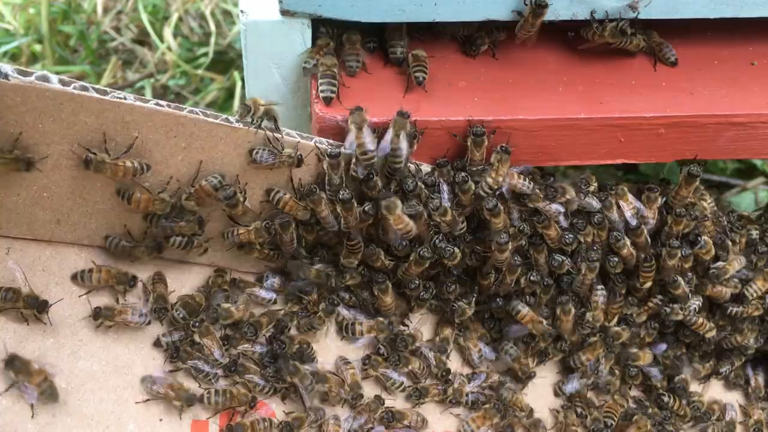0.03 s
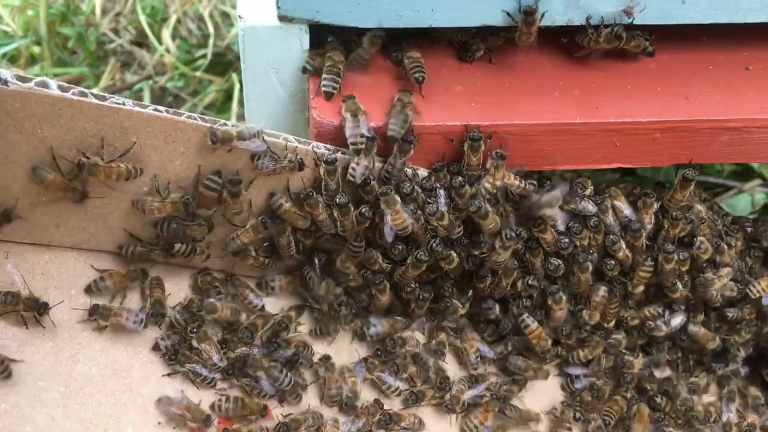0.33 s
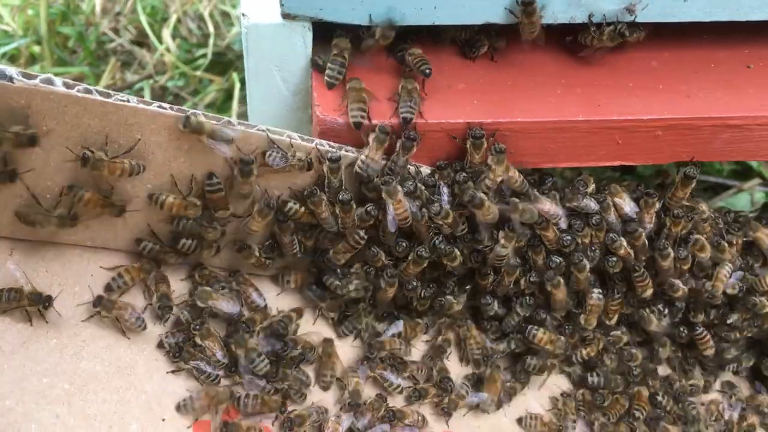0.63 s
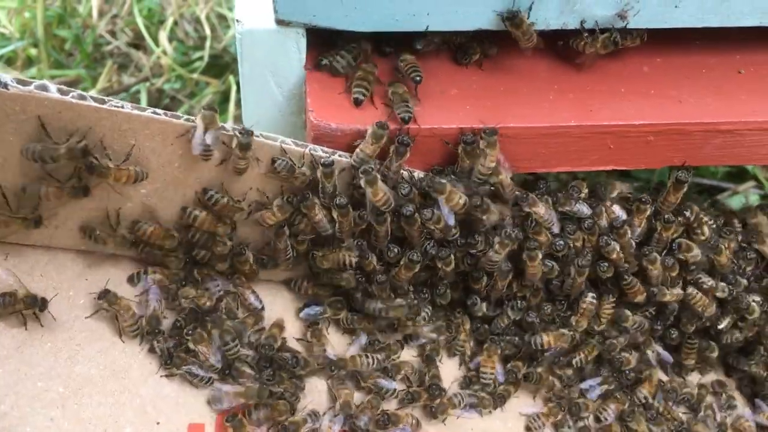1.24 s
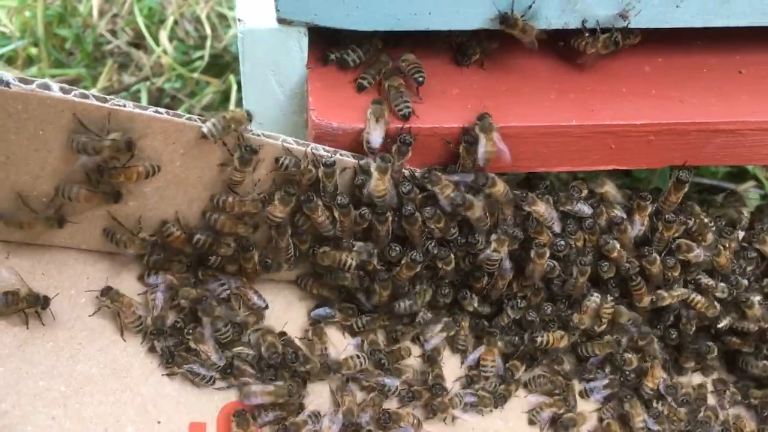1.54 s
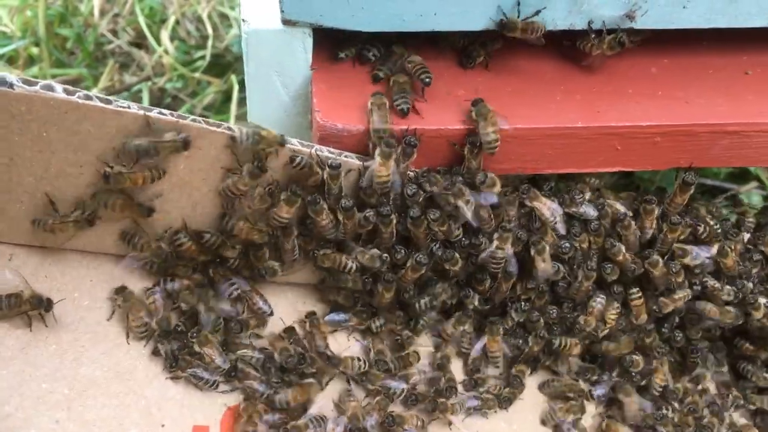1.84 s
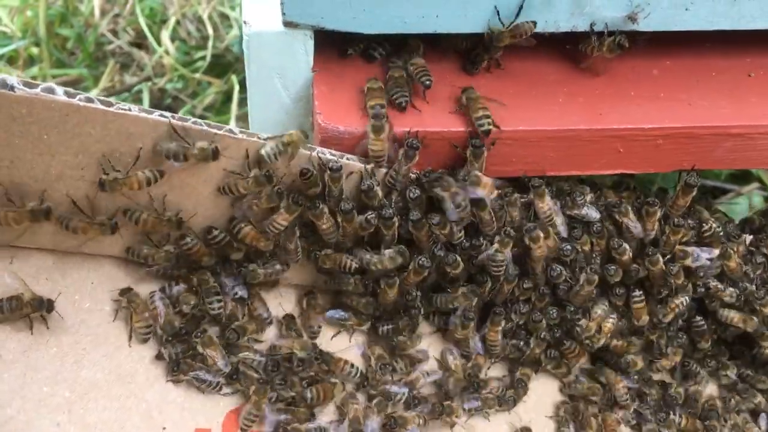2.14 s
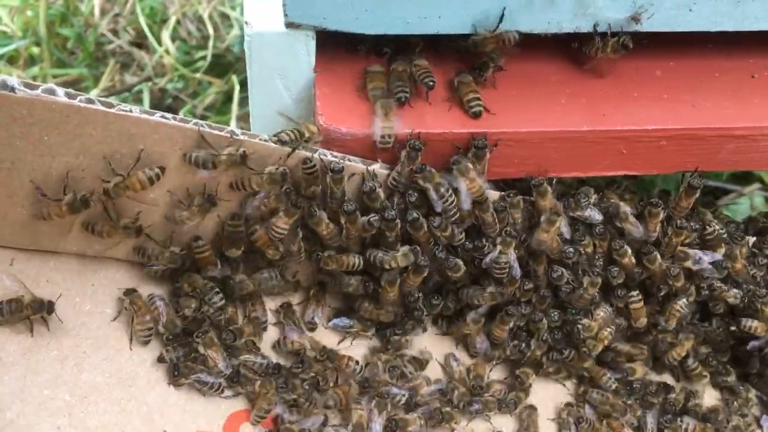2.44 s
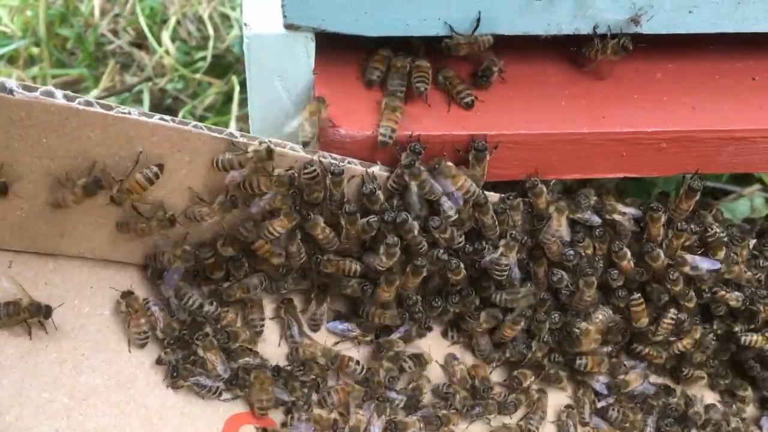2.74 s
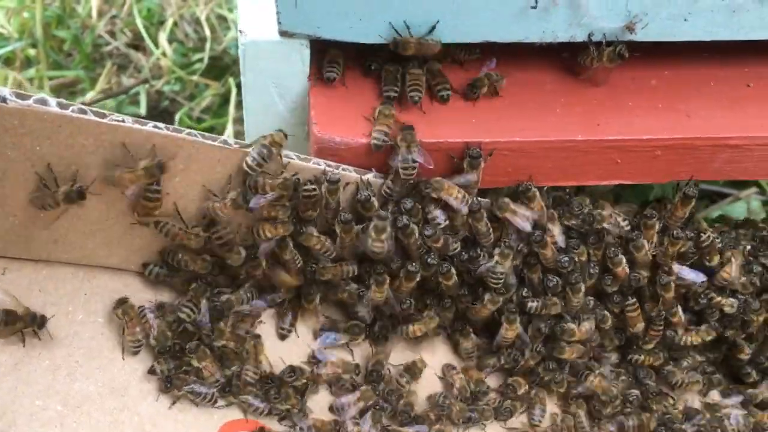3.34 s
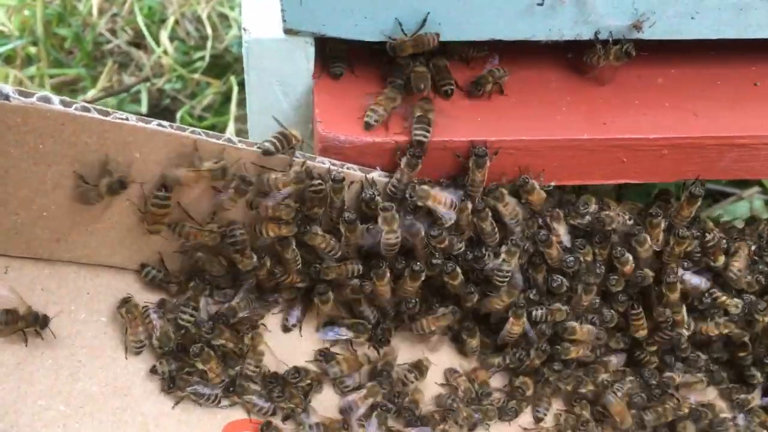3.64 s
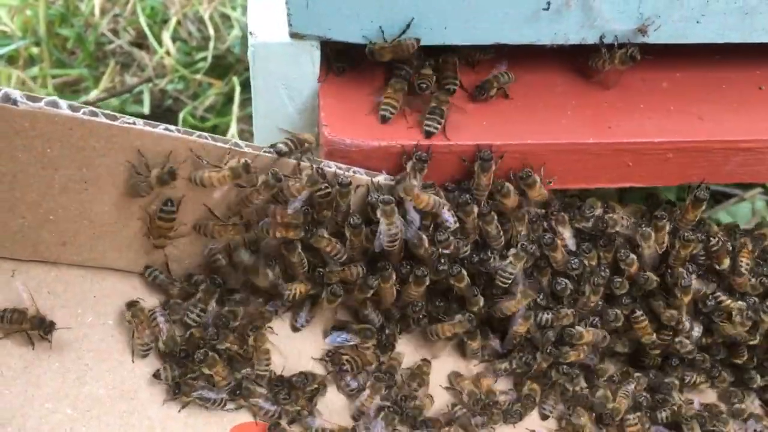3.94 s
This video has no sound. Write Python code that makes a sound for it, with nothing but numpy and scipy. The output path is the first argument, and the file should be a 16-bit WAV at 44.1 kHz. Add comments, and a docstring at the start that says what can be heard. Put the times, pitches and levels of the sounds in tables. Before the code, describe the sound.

Crawling honeybees rustle without a break, heard up close as countless feet tick and scrape on cardboard. Under that, their wings hum softly, swelling and sinking a little, over a gentle low rumble of open air.

```python
"""A steady, close rustle: a dense heap of honeybees crawling over cardboard in front of a hive.
Thousands of feet tick and scrape, and the card gives them all its colour.
Under the rustle sits the hum of many shivering wings, one puff of air per beat,
and behind that a soft low rumble of outdoor air."""
import sys
import numpy as np
from scipy import signal
from scipy.fft import rfft, irfft
from scipy.io import wavfile

SR = 44100
rng = np.random.default_rng(int(sys.argv[2]) if len(sys.argv) > 2 else 0)


def unload_wav(signal):
    """Save mono or channel-first audio to the path in sys.argv[1] as 16-bit WAV at rate SR, clipped to [-1, 1]."""
    wavfile.write(
        sys.argv[1],
        SR,
        np.round(np.clip(np.atleast_2d(signal).T, -1, 1) * 32767).astype(np.int16),
    )


N = 176400

# The tone of a footfall on cardboard. Each row: frequency in Hz, relative gain in dB.
CARDBOARD_EQ = [(100, -15), (300, 0.5), (490, -2.5), (600, 0), (760, -0.76), (1100, .5), (1800, -0.5),
                (2650, 0), (3100, -3.5), (3800, -11.5), (4450, -17), (4900, -23), (5250, -22), (6000, -23),
                (7600, -32), (9100, -33.5), (9900, -36), (10450, -41.5), (10900, -38), (12000, -39),
                (15500, -45)]
# The tone shaping of the wing puffs. Each row: frequency in Hz, relative gain in dB.
WING_EQ = [(70, -9), (120, 3.5), (175, 0.5), (245, -4), (315, -2.5), (450, -13.5), (900, -18),
           (2500, -25.5), (6000, -63)]
# The bass-heavy tone of outdoor air. Each row: frequency in Hz, relative gain in dB.
AIR_EQ = [(15, -60), (25, -21), (35, -12), (54, -0.5), (70, -2), (94, 1), (110, -7), (250, -12.5),
          (500, -19.5), (2000, -41), (8000, -68)]
# The rise and fall of the wing hum. Each row: time in seconds, level in dB.
HUM_FADER = [(0, -45.5), (.35, -48), (.52, -45), (.8, -45), (1.1, -49), (1.35, -44.5), (1.85, -49.5),
             (2.05, -46.5), (2.55, -45), (2.8, -48.5), (3.1, -44.5), (3.35, -48.5), (3.55, -46), (4, -45)]
# The gentle swells of the rumble. Each row: time in seconds, level in dB.
AIR_FADER = [(0, -51), (.2, -48.5), (.29, -44), (.4, -45), (.7, -46), (1.05, -45.5), (1.5, -43.5),
             (1.9, -45), (2.2, -45), (2.4, -41.5), (2.6, -43.5), (2.8, -46), (3.12, -46), (3.33, -45),
             (3.6, -44.5), (4, -46)]

STEPS_PER_S, STEP_SPREAD_DB = 14000, 1.5
STEPS_DB, SCRAPE_DB = -43, -41.5
BUSTLE_DB, BUSTLE_PER_S = 0.14, 12   # the whole heap stirs and settles
FLICKER_DB, FLICKER_PER_S = 0.4, 18
WING_LOW_HZ, WING_HIGH_HZ = 109.98, 249.75
WANDER_SHARE, WANDER_PER_S = .05, 3   # each bee's beat rate wavers
FANNING_DB, FANNING_PER_S = 3.5, 3.1   # each bee fans harder and softer


def crawling_bees():
    """Feet tick, legs and bodies slide over each other, and both sound through the cardboard."""
    bustle = from_db(BUSTLE_DB * drift(BUSTLE_PER_S))
    footfalls = rng.random(N) < STEPS_PER_S * bustle / SR
    accent_db = STEP_SPREAD_DB * np.minimum(rng.exponential(1, N), 5)
    polarity = rng.choice([-1, 1], N)
    ticks = from_db(STEPS_DB) * equalise(footfalls * from_db(accent_db) * polarity, CARDBOARD_EQ)
    scrape = from_db(SCRAPE_DB) * equalise(rng.standard_normal(N), CARDBOARD_EQ)
    return flicker(bustle * (ticks + scrape))


def flicker(rustle, bands=10):
    """Overlapping bands of the rustle each swell and sink a little on their own."""
    centres = np.log(np.geomspace(400, 14000, bands))
    bins, spectrum = log_bins(), rfft(rustle)
    mix = np.zeros(N)
    for solo in np.eye(bands):
        band = irfft(spectrum * np.interp(bins, centres, solo), N)
        mix += band * from_db(FLICKER_DB * drift(FLICKER_PER_S))
    return mix


def wing_hum(bees=24):
    """Each bee gives one puff per wingbeat, at a wandering rate and strength of its own."""
    puffs = np.zeros(N)
    for centre_hz in np.geomspace(WING_LOW_HZ, WING_HIGH_HZ, bees):
        start_phase = rng.random()
        beat_hz = centre_hz * np.exp(WANDER_SHARE * drift(WANDER_PER_S))
        beat_count = np.floor(start_phase + np.cumsum(beat_hz) / SR)
        puffs += np.diff(beat_count, prepend=0) * from_db(FANNING_DB * drift(FANNING_PER_S))
    low_cut = signal.butter(2, 70, "high", fs=SR, output="sos")
    puffs = signal.sosfilt(low_cut, puffs - puffs.mean())
    return fader(HUM_FADER) * equalise(puffs, WING_EQ)


def outdoor_air():
    """A bed of low, gently swelling noise."""
    return fader(AIR_FADER) * equalise(rng.standard_normal(N), AIR_EQ)


def from_db(db):
    """Decibels to gain."""
    return 10 ** (np.asarray(db) / 20)


def rms_one(x):
    """Scale to rms 1."""
    return x / np.sqrt(np.mean(x ** 2) + 1e-20)


def drift(per_s):
    """Slow random modulation with a spread of 1."""
    hop, run_in = 40, 2000   # samples per control step, steps to settle
    pole = np.exp(-2 * np.pi * per_s * hop / SR)
    noise = rng.standard_normal(N // hop + run_in + 2)
    slow = signal.lfilter([1], [1, -2 * pole, pole * pole], noise)[run_in:]
    return np.interp(np.arange(N) / hop, np.arange(len(slow)), rms_one(slow - slow.mean()))


def log_bins():
    """Log frequency of every spectral bin."""
    return np.log(np.maximum(np.arange(N // 2 + 1) * SR / N, 1))


def equalise(x, curve):
    """Apply an EQ curve, then scale to rms 1."""
    hz, db = np.transpose(curve)
    gain = from_db(np.interp(log_bins(), np.log(hz), db))
    return rms_one(irfft(rfft(x) * gain, N))


def fader(rows):
    """The gain of a level curve at every sample."""
    return from_db(np.interp(np.arange(N) / SR, *np.transpose(rows)))


def scene():
    """Rustle, hum and air, mixed to mono."""
    return (crawling_bees() + wing_hum() + outdoor_air())[None]


def record(dry):
    """A moment of silence, a snap fade-in and a steep high cut."""
    start_s, fade_s, cutoff_hz = 0.0345, 0.0017, 15750
    fade_in = np.clip((np.arange(N) / SR - start_s) / fade_s, 0, 1)
    high_cut = signal.ellip(12, .1, 70, cutoff_hz, fs=SR, output="sos")
    return signal.sosfilt(high_cut, dry * fade_in)


dry = scene()
out = record(dry)
unload_wav(out)
```